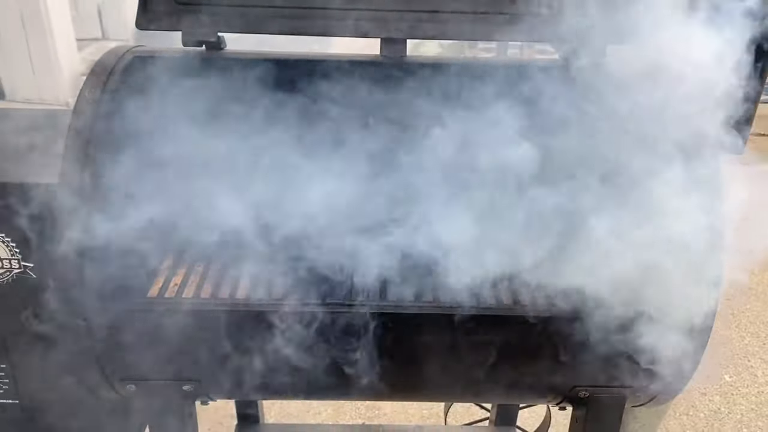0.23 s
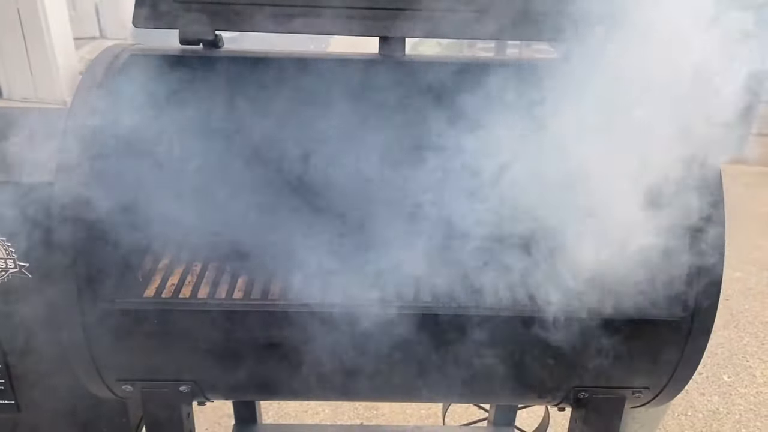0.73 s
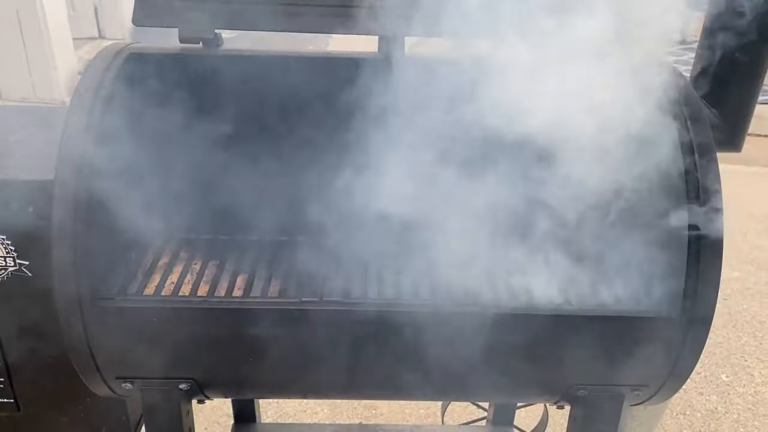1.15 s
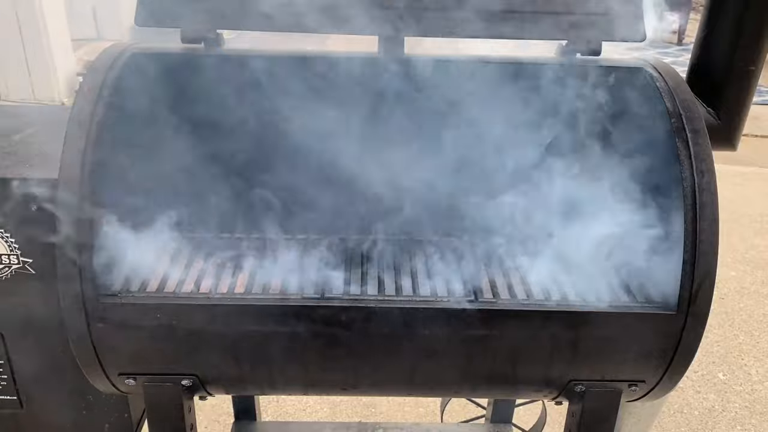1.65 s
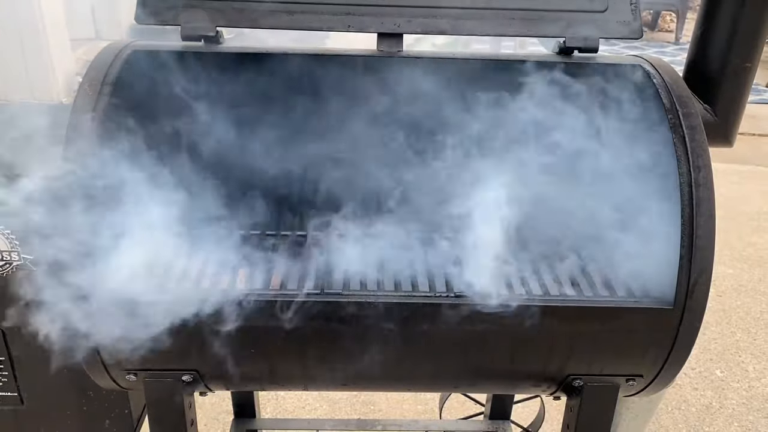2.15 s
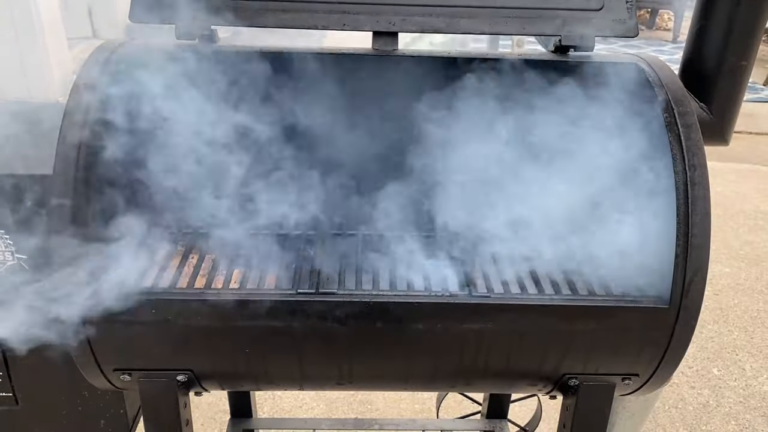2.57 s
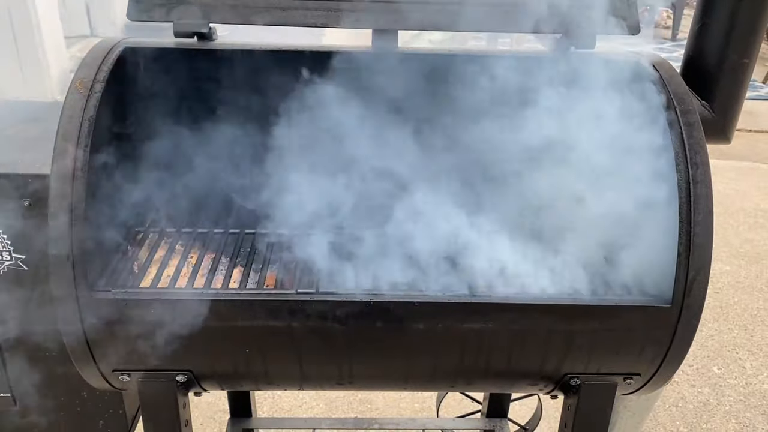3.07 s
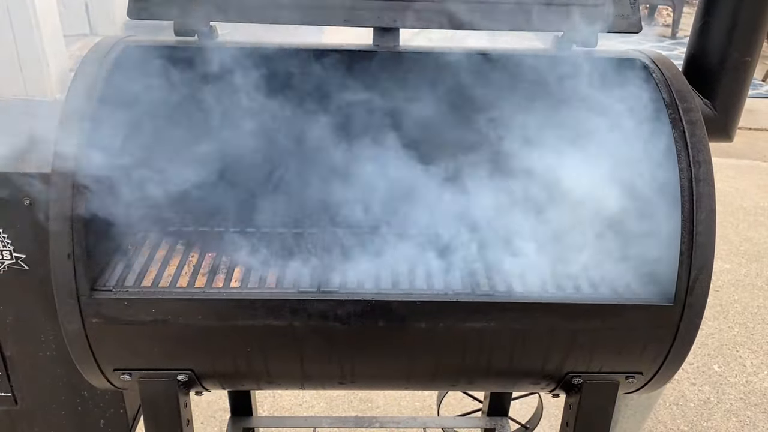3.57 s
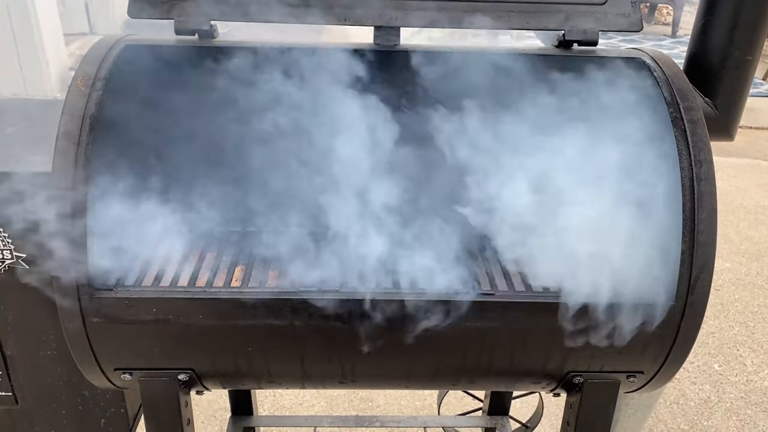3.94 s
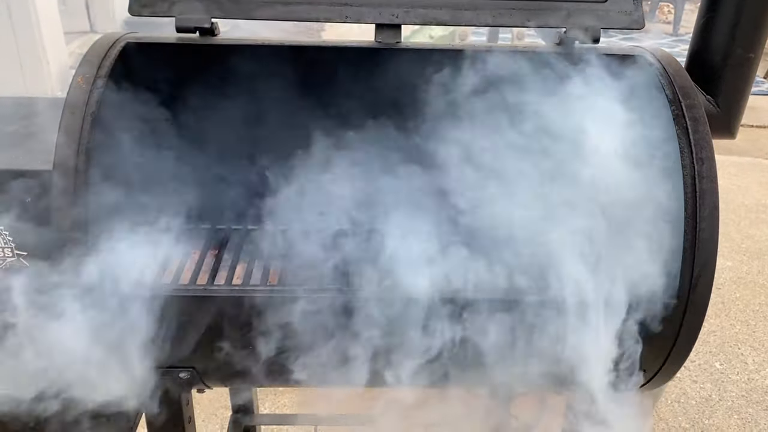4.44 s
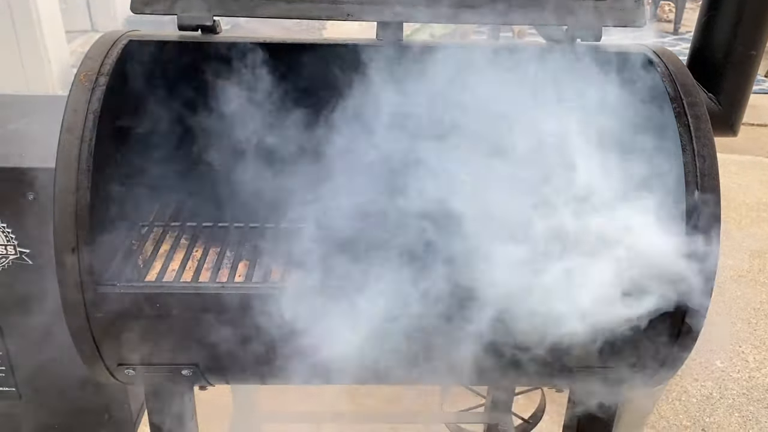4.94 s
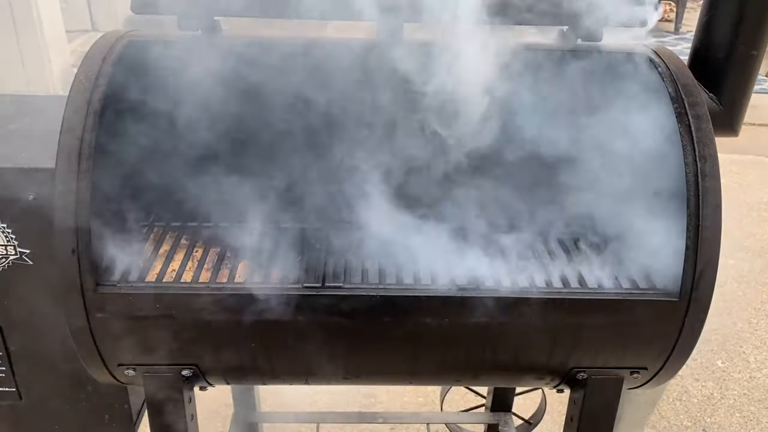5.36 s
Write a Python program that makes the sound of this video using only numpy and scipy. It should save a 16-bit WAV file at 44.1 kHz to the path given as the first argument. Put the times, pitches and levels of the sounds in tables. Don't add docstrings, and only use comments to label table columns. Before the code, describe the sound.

Outdoors, about a metre from an open pellet grill, a fan blows a steady hollow roar through the metal barrel over a low motor hum and thin whine. After about one and a half seconds, breeze buffets the phone's microphones with deep uneven rumble, flutter and soft low thumps, strongest near four to five seconds, then easing.

```python
import sys
import numpy as np
from scipy import signal
from scipy.fft import rfft, irfft
from scipy.io import wavfile
from scipy.ndimage import uniform_filter1d

SR = 44100
rng = np.random.default_rng(int(sys.argv[2]) if len(sys.argv) > 2 else 0)


def digitize_waveform(pressure):
    field = np.atleast_2d(pressure).T
    bounded = np.clip(field, -1, 1)
    quanta = np.round(bounded * 32767).astype(np.int16)
    wavfile.write(sys.argv[1], SR, quanta)


def makeup_ratio(level_db):
    decades = np.asarray(level_db, float) / 20
    return 10 ** decades


N = 247074
TIME = np.arange(N) / SR
HZ = np.fft.rfftfreq(N, 1 / SR) + 1e-3
SHAFT_BEAT_HZ = 9.4


def air():
    # (frequency [Hz], level [dB per Hz])
    rush = [(20, -110), (50, -85), (90, -67), (300, -72.5), (400, -76.5), (900, -79), (1400, -85.5),
            (2000, -89), (3300, -89), (5200, -100), (7300, -107), (11000, -109), (15000, -114),
            (15600, -119)]
    # (frequency [Hz], width [Hz], level [dB per Hz], left minus right [dB])
    barrel = [(117, 48, -52, -1.5), (169.5, 17, -59, -6), (215, 53, -51.5, 0), (270, 23.4, -60, -8.5),
              (320, 71, -74, -8), (487.5, 62, -65.5, 7), (566.3, 37, -67.5, -2), (621, 56, -70, 7),
              (751.4, 72, -71.5, 6), (951, 101, -75.5, 11.5), (1034, 112, -76, 8), (1222, 70, -78.5, -3),
              (1511, 145, -80, 2.5), (2368, 64, -90.5, 24.5), (2800, 76, -95, 8.5), (3052, 123, -84.5, 8),
              (3960, 270, -100, 13), (4250, 170, -92.5, 0), (4710, 120, -90.5, 1.5), (5080, 190, -93, 0),
              (5800, 200, -101, 1.5), (6460, 530, -102, 9), (14900, 800, -113, -1.5)]
    # (frequency [Hz], width [Hz], rms level [dB], left minus right [dB])
    blades = [
        (239.7, 8, -43, -3.5),
        (479, 19, -55, -7),
        (964, 3.5, -61.5, 11),
    ]

    power = colour(rush) ** 2
    for hz, width, db, left_right_db in barrel:
        power = power + makeup_ratio(2 * db) * np.outer(pan(left_right_db) ** 2, resonance(hz, width / 2))
    power = power * HZ ** 4 / (HZ ** 4 + 90 ** 4)
    for hz, width, db, left_right_db in blades:
        power_per_hz = makeup_ratio(2 * db) / (np.pi * width / 4)
        power = power + power_per_hz * np.outer(pan(left_right_db) ** 2, resonance(hz, width / 2))
    spectrum = at_ports(power)

    swell = walk(0.58)
    turn = 2 * np.pi * SHAFT_BEAT_HZ * TIME + 0.5 * walk(3.3)
    throb = np.cos(turn) + 0.8 * np.cos(2 * turn) + 0.6 * np.cos(3 * turn)
    out = 0
    for centre_hz in 2.0 ** np.arange(4, 16):
        octave = np.cos(np.pi / 2 * np.clip(np.log2(HZ / centre_hz), -1, 1)) ** 2
        throb_db = 0.59 * throb * min(centre_hz / 5000, 1)
        flicker_db = 0.074 * swell + 0.5 * walk(11) + throb_db
        out = out + makeup_ratio(flicker_db) * irfft(spectrum * octave, N)
    return out


def motor():
    # (frequency [Hz], rms level [dB], left lead [rad])
    tones = [(120.17, -33, -0.14), (240.3, -40, 0), (897, -63, 0.5), (1045.5, -60, .8), (1170, -67, 2.5),
             (1304, -82, 0), (1410, -86, 2.1), (1480, -81, 1.5), (1549.8, -56.5, -0.3), (1660, -80.5, .7),
             (1750, -77, -5.5)]
    beat = np.sin(2 * np.pi * SHAFT_BEAT_HZ * TIME)
    out = 0
    for hz, db, lead in tones:
        phase = 2 * np.pi * (hz * TIME + rng.random()) + 0.3 * walk(2) + 0.15 * beat
        wobble_db = 1.2 * walk(3)
        port_phase = np.array([[lead], [-lead]]) / 2
        out = out + np.sqrt(2) * makeup_ratio(db + wobble_db) * np.sin(phase + port_phase)
    return out


def breeze():
    # (time [s], rumble level [dB])
    wind = [(0.0, -59), (0.1, -63), (0.62, -55), (1.26, -63), (1.5, -44.5), (1.9, -34.5), (2.1, -40.5),
            (2.5, -31.5), (3.0, -36.5), (3.45, -35), (3.9, -36), (4.05, -29), (4.4, -32), (4.52, -30.5),
            (4.9, -29.5), (5.02, -36), (5.3, -42), (5.6, -47)]
    # (time of peak [s], rumble level [dB], length [s])
    eddies = [(1.325, -42, .1), (1.563, -37, 0.11), (1.754, -34, 0.13), (1.85, -30, .08), (1.93, -37, .08),
              (2.192, -27.5, .07), (2.31, -24, 0.08), (2.4, -30.5, 0.051), (2.577, -27, 0.13),
              (2.664, -28, 0.08), (2.772, -23, 0.041), (2.891, -27, .1), (3.05, -31, 0.07),
              (3.117, -28, 0.051), (3.27, -31, .08), (3.382, -33, .08), (3.544, -33.5, 0.11),
              (3.705, -33, 0.068), (3.778, -27, 0.079), (3.98, -22.5, 0.081), (4.261, -28, 0.042),
              (4.374, -28.5, 0.14), (4.572, -25, 0.11), (4.685, -20.5, 0.094), (4.81, -24, 0.044),
              (4.943, -25.5, 0.14), (5.187, -39, 0.052), (5.433, -31, 0.095), (5.572, -26.5, 0.073)]
    # (frequency [Hz], level [dB])
    rumble = [(12, -34.5), (25, -7), (38, 3.5), (50, 12.5), (80, 12), (110, 6.5), (160, -8), (300, -48.5),
              (600, -120)]
    # (frequency [Hz], level [dB])
    flutter = [(40, -47), (70, -11.5), (100, 1), (140, 8), (200, -8.5), (300, -18), (450, -28), (700, -63),
               (1500, -120)]

    power = makeup_ratio(2 * np.interp(TIME, *np.transpose(wind)))
    for peak_s, db, length in eddies:
        bump = np.cos(np.pi * np.clip((TIME - peak_s) / length, -0.5, 0.5)) ** 4
        power = power + makeup_ratio(2 * db) * bump
    rumble_db = 10 * np.log10(power)
    strong_db = -37
    flutter_db = strong_db - 4 + 0.85 * (rumble_db - strong_db)

    out = 0
    for tint, db, patchy_db, apart_db in ((rumble, rumble_db, 1.5, -14), (flutter, flutter_db, 3.5, -9)):
        shared = gusty_noise(tint, patchy_db)
        apart = gusty_noise(tint, patchy_db) * np.array([[1], [-1]])
        out = out + makeup_ratio(db) * (shared + makeup_ratio(apart_db) * apart)
    sway_db = 1.9 * walk(15)
    return out * pan(sway_db)


def gusty_noise(tint, patchy_db):
    steady = evened(irfft(noise() * colour(tint), N))
    return level(steady * makeup_ratio(patchy_db * walk(25)), 0)


def evened(x):
    k = int(0.043 * SR)
    evenness = 0.6
    power = uniform_filter1d(uniform_filter1d(x ** 2, k), k)
    return x / (power + 1e-12) ** (evenness / 2)


def pops():
    # (time [s], peak level [dB], final pitch [Hz], length [cycles])
    bursts = [(1.839, -20, 149, 2.9), (2.277, -28, 260, 5), (2.281, -14, 89, 2.3), (2.367, -17, 253, 2.9),
              (2.371, -17, 102, 2.5), (2.418, -25, 197, 3.7), (2.549, -26.5, 240, 3.3),
              (2.579, -20, 65, 2.8), (2.762, -20.5, 109, 2.2), (2.96, -21.5, 125, 4.5),
              (3.943, -20, 290, 2.3), (3.948, -12.5, 89.6, 2.7), (3.982, -24.5, 280, 2.4),
              (3.983, -11, 79, 2.3), (4.122, -19.5, 137, 2.3), (4.683, -14, 93.8, 2.6),
              (4.765, -25.5, 278, 2.7), (4.765, -12, 134, 3.2), (4.809, -16, 111, 2.9),
              (4.918, -28, 270, 2.4), (4.921, -16.5, 154, 3.0)]
    slide_s, right_early_s = 0.0029, 0.0005
    out = np.zeros((2, N))
    for start, db, low_hz, turns in bursts:
        t = np.clip(TIME - start + np.array([[0], [right_early_s]]), 0, None)
        top_hz = low_hz * (1.69 + 2.7 * low_hz / 1000)
        cycles = low_hz * t + (top_hz - low_hz) * slide_s * (1 - np.exp(-t / slide_s))
        shape = np.sin(np.pi * np.clip(t * low_hz / turns, 0, 1) ** 0.79) ** 2
        out += makeup_ratio(db) * pan(2.5)[:, None] * shape * np.sin(2 * np.pi * cycles)
    return out


def swish():
    # (time at full strength [s], level [dB], held [s], rise [dB per s], fall [dB per s])
    swells = [
        (1.4, -61, .05, 60, 14.5),
        (4.5, -55.5, 0.5, 36.5, 42),
    ]
    gain = makeup_ratio(-69)
    for start, db, held, rise, fall in swells:
        rising_db = rise * (TIME - start)
        falling_db = fall * (start + held - TIME)
        gain = gain + makeup_ratio(db + np.minimum(0, np.minimum(rising_db, falling_db)))
    shape = np.sqrt(resonance(2080, 320))
    band = np.array([level(irfft(noise() * shape, N), 0) for _ in range(2)])
    return band * gain * makeup_ratio(1.1 * walk(20)) * pan(-2.5)[:, None]


def at_ports(power):
    # (frequency [Hz], left lead [rad], likeness [0-1])
    ports = [(120, .1, .998), (250, 0, .995), (600, .7, .97), (1130, .8, .96), (1400, 2.1, .85),
             (1900, 2.4, .55), (2100, .1, .72), (3000, 1.5, .9), (3300, 3.1, .8), (3850, 5.7, .86),
             (5500, 5.9, .72), (6250, 6.2, .97), (6900, 6.28, .995), (15300, -6.28, .995)]
    hz, lead, like = np.transpose(ports)
    turn = np.exp(1j * np.interp(HZ, hz, lead) / 2)
    like = np.interp(HZ, hz, like)
    shared = noise() * np.array([turn, turn.conj()])
    own = np.array([noise(), noise()])
    return np.sqrt(power) * (np.sqrt(like) * shared + np.sqrt(1 - like) * own)


def level(x, db):
    return x * makeup_ratio(db) / np.sqrt(np.mean(x ** 2))


def noise():
    return rfft(rng.standard_normal(N)) * np.sqrt(SR / 2)


def colour(points):
    hz, db = np.transpose(points)
    return makeup_ratio(np.interp(np.log(HZ), np.log(hz), db))


def walk(rate):
    k = int(SR / rate)
    steps = np.repeat(rng.standard_normal(N // k + 1), k)
    return 1.15 * uniform_filter1d(uniform_filter1d(steps, k), k)[:N]


def pan(db):
    return makeup_ratio(np.array([db, -db]) / 2)


def resonance(hz, width):
    return 1 / (1 + ((HZ - hz) / width) ** 2) ** 2


def scene():
    return air() + motor() + breeze() + pops() + swish()


def roll_off(x):
    return signal.sosfilt(signal.butter(12, 16600, fs=SR, output="sos"), x)


def record(dry):
    bass_cut = (HZ / 28) ** 2 / np.sqrt(1 + (HZ / 28) ** 4)
    band = bass_cut * (HZ < 15750)
    return roll_off(irfft(rfft(dry) * band, N))


dry = scene()
out = record(dry)
digitize_waveform(out)
```